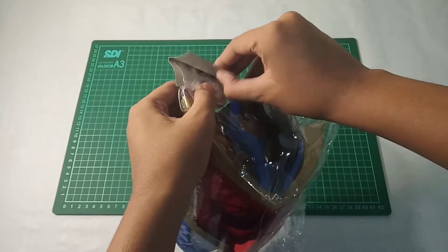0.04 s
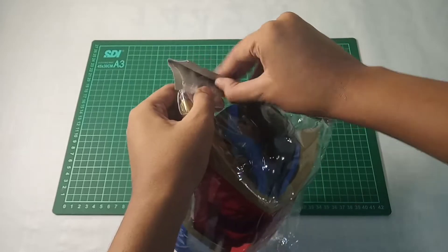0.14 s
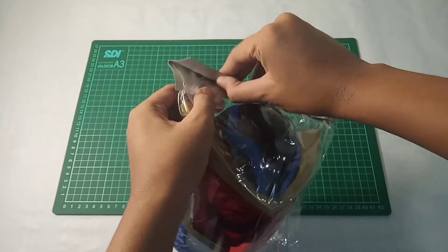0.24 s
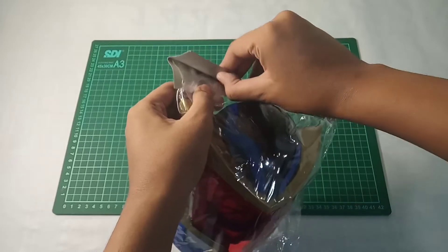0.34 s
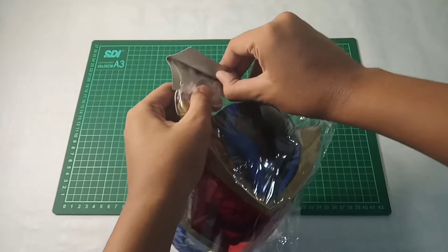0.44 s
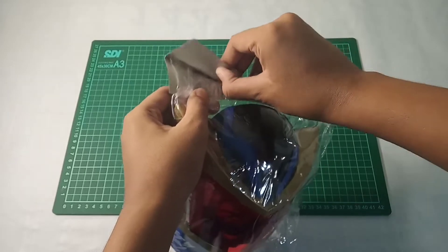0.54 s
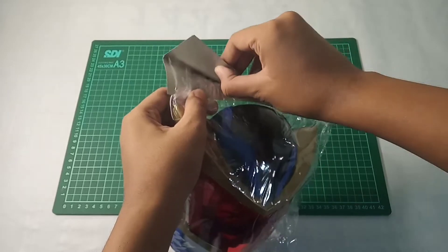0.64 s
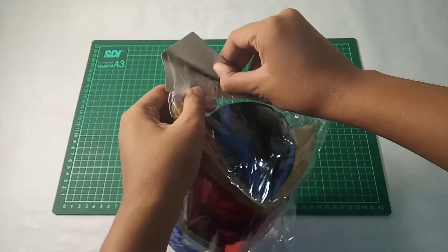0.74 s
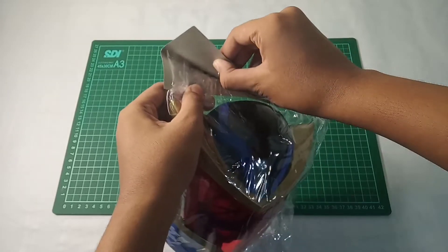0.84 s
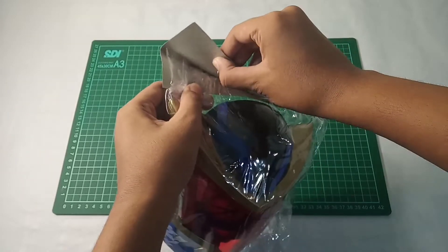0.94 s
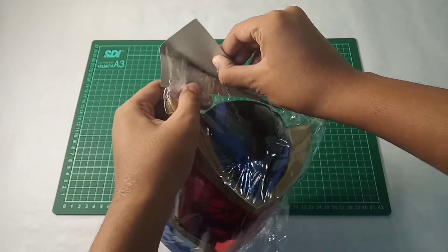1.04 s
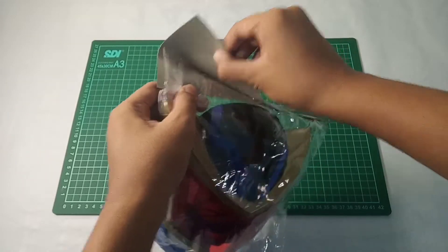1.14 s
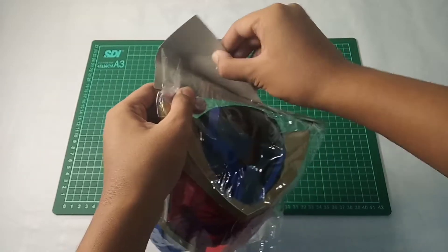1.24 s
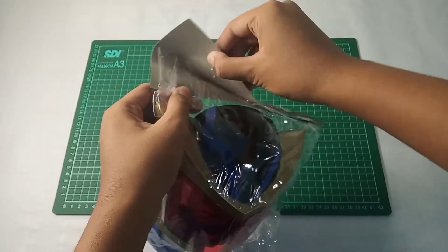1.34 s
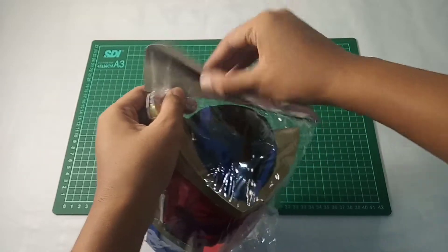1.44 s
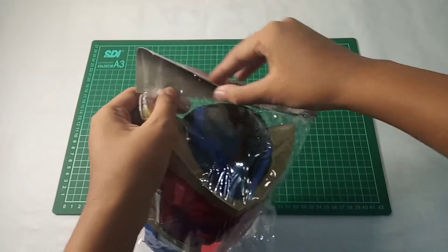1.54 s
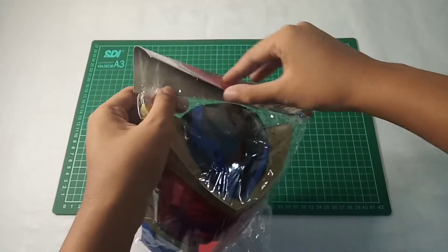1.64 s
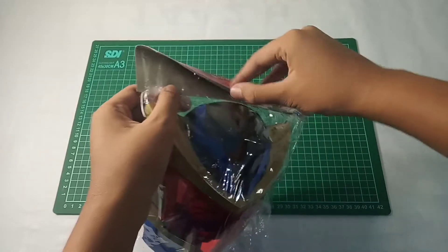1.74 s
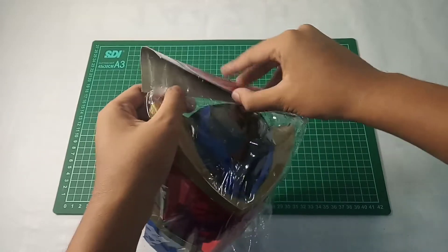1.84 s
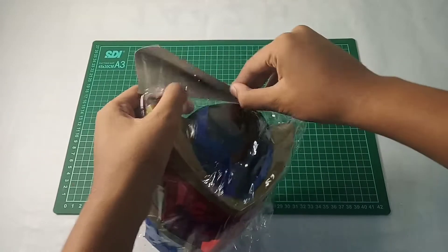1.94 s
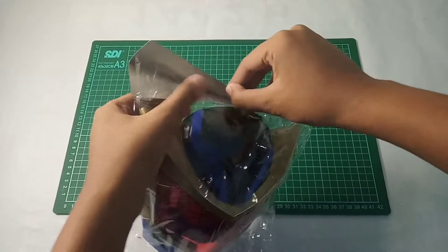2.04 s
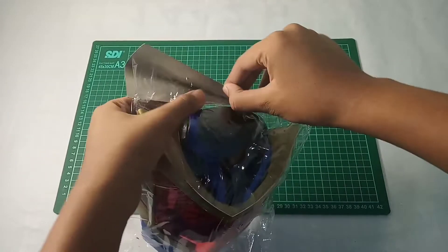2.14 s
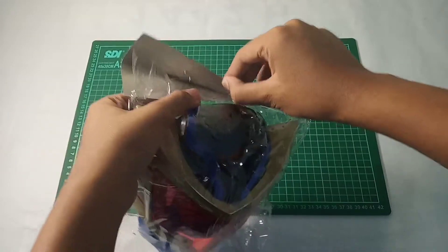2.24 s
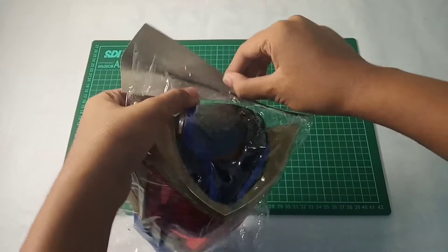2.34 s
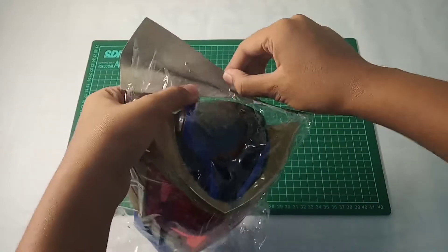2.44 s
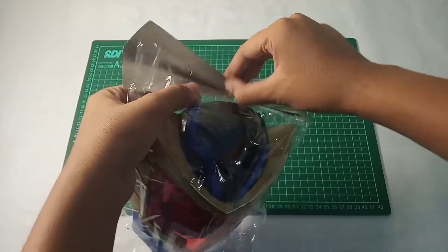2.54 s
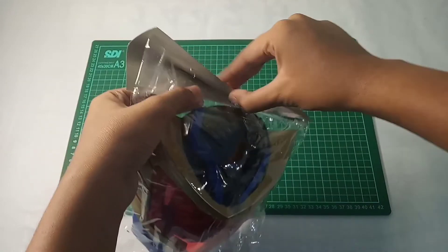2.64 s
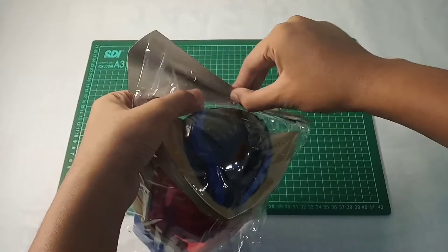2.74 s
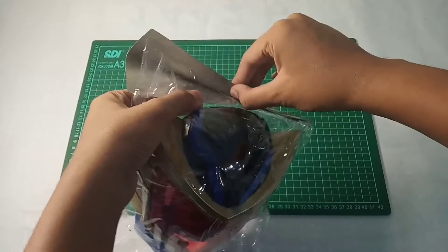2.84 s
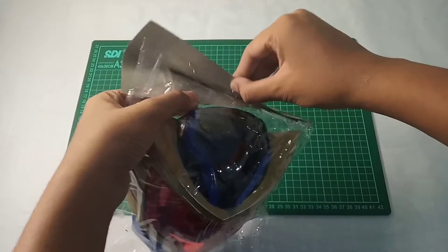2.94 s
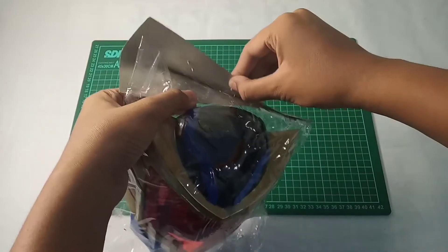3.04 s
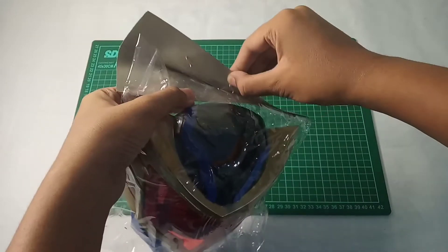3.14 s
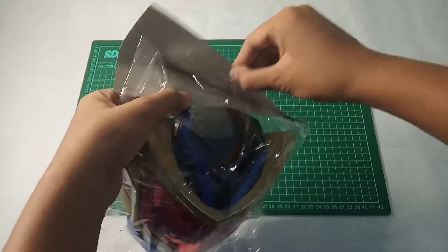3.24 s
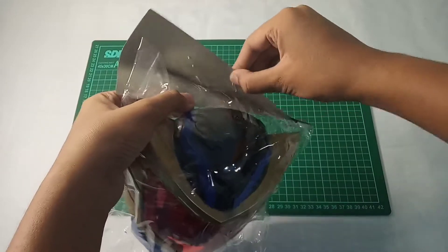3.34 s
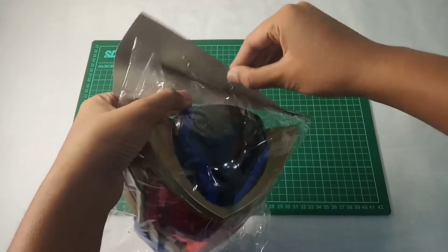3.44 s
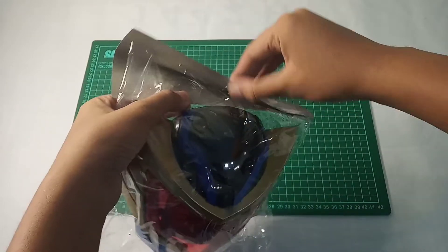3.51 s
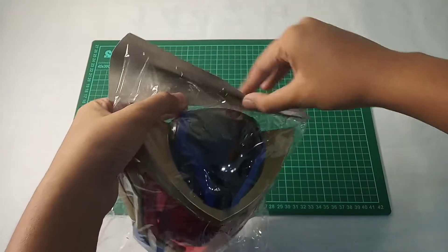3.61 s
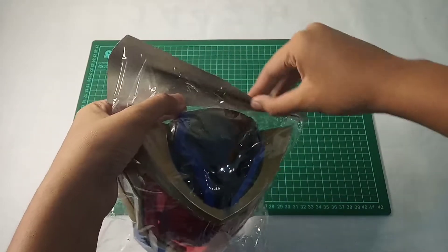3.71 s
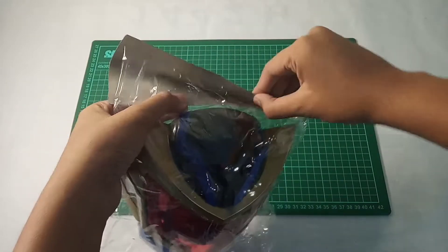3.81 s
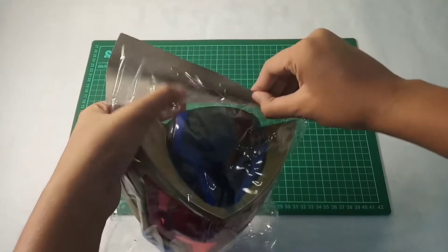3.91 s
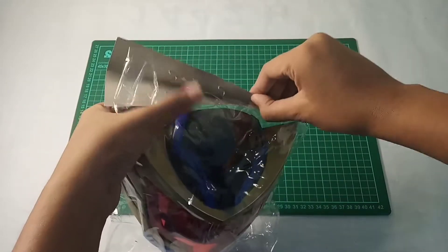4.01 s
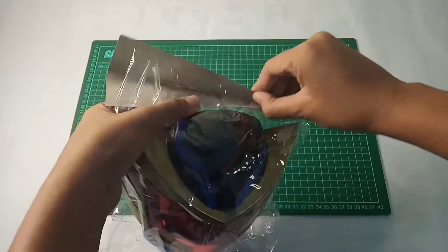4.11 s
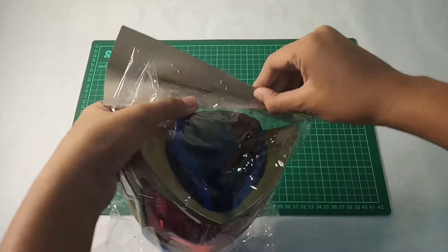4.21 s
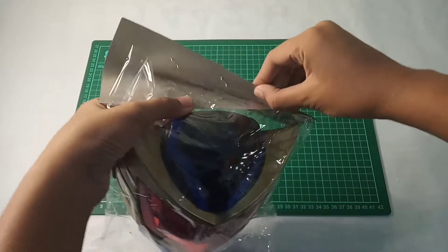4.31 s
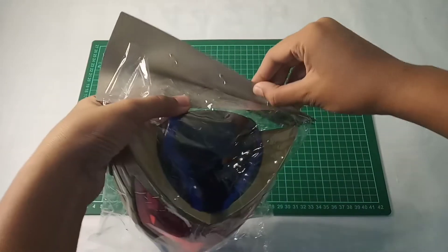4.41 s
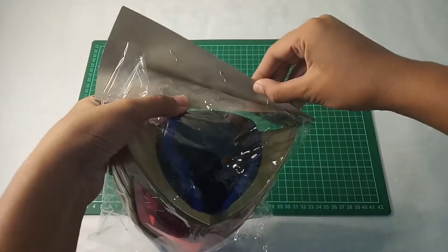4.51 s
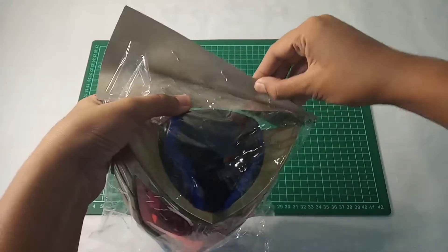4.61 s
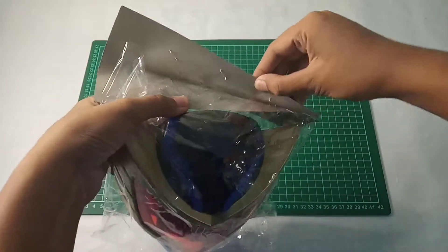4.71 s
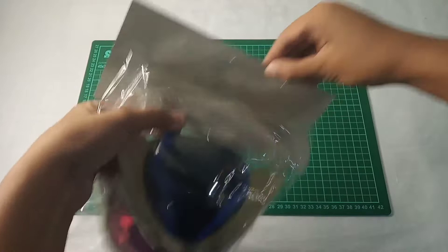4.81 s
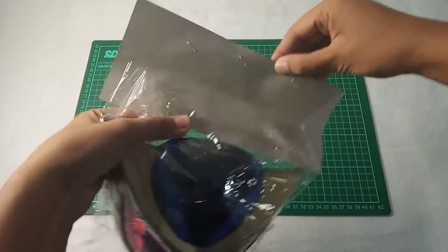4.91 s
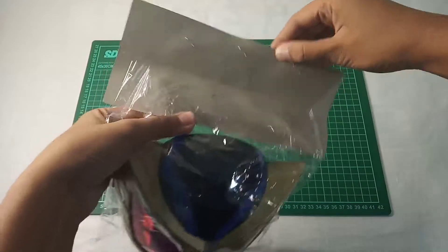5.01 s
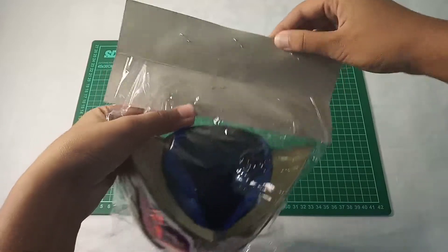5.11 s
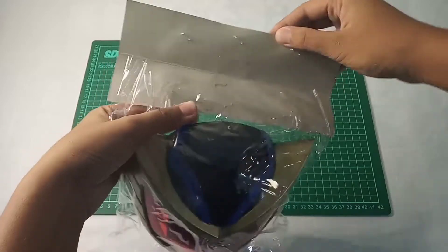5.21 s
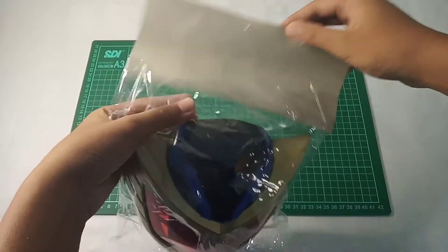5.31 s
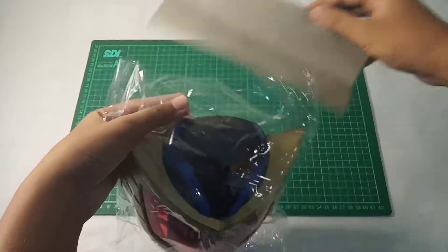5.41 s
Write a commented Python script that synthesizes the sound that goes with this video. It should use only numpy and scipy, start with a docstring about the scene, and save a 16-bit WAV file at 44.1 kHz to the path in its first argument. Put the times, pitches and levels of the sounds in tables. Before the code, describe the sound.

A close microphone in a small bare room catches stiff clear plastic being peeled open. Light crinkles tick at 0.1-0.2 s, then a near pause until a hard bright crack at 0.6 s. Another strong snap with a low flap lands at 1.2 s, followed by smaller clicks around 1.5 and 1.8 s. From 2.0 to 3.1 s the crackling is almost continuous: dull, papery buckles and short rustling slides, with sharper ticks among them. The heaviest pop, a floppy thump of the sheet with a bright edge, comes at 3.3 s. Scattered snaps follow at 3.6 s, a tight cluster at 4.0-4.1 s, and more at 4.3 and 4.5 s. A brilliant, loud burst bursts out at 4.8-4.9 s, then fades to faint scuffs, thin squeaky drag and small clicks around 5.3 s. Short reflections and a low boom trail the loud snaps; faint room noise and a slowly growing low hum lie beneath.

```python
"""Creases in a clear plastic bag buckle with sharp snaps as two hands peel a card out of it on a cutting mat.
Each snap is a click, a burst of noise and a ringing facet of film; low flaps are short swings of the sheet.
Between snaps the film slides (noise shaken by tiny slips), ticks at random, and flutters or sings (noise bands).
It is close to the microphone in a small bare room: the mat and walls throw the sound back, with a low boom.
Behind it lie a faint low hum that slowly grows and steady room noise."""
import sys
import numpy as np
from scipy import signal
from scipy.fft import rfft, irfft, next_fast_len
from scipy.io import wavfile
from scipy.ndimage import uniform_filter1d

SR = 44100
rng = np.random.default_rng(int(sys.argv[2]) if len(sys.argv) > 2 else 0)


def persist_wave(psi):
    """Save psi, clipped to +-1, as 16-bit WAV."""
    counts = np.round(np.clip(psi, -1, 1) * 32767).astype(np.int16)
    wavfile.write(sys.argv[1], SR, np.atleast_2d(counts).T)


N = 240991  # length of the scene in samples

# the film's four pitch ranges, called body, crack, fizz and sparkle: low edge f/Hz, high edge f/Hz
RANGES = [(620, 2200), (2200, 7500), (7500, 11000), (11000, 16000)]
# tone colour of the film: f/Hz, level/dB
FILM_COLOUR = [(200, 14.5), (700, 6.5), (950, 3), (1350, 0.5), (1850, -1.5), (2500, 6), (3100, 7),
               (3900, 7.5), (5000, 4.5), (6300, 3.5), (7600, -12.5), (9500, -8), (12000, -23),
               (15500, -29.5)]
SNAP_SIZE = 2048  # samples in one short sound
TOP_HZ = 15550  # nothing much is heard above this
DIRECTIONS = 6  # ways in which the film sends out its sound


def creases():
    """Buckling creases snap and nudge the sheet, which also flaps; brightness tips a snap from body to fizz."""
    # creases that buckle: t/s, level before the snap's trim/dB, brightness/dB, facet f/Hz, ring time/ms
    buckles = [(.115, -47.5, 6.5, 6100, 7.6), (.17, -46.5, 5, 3030, 10), (.221, -47, 2.5, 6260, 2.3),
               (0.465, -68.5, 24.5, 5860, 5), (0.523, -55.5, 14, 5730, 3), (0.566, -41.5, 2, 1425, 6),
               (.601, -31.5, 2, 1540, 2.3), (.6154, -22, 4.5, 4020, 1.44), (1.082, -41.5, 5, 1460, 3),
               (1.155, -51, 4, 3540, 4.6), (1.19, -19, 4.5, 1560, 1.83), (1.229, -34.5, 3, 2520, 6.6),
               (1.459, -48, 7, 3500, 1.5), (1.508, -42.5, 4, 2940, 2.1), (1.512, -31, 6, 2110, 4.5),
               (1.543, -38.5, 6.5, 5170, 1.2), (1.558, -44.5, 3.5, 980, 20), (1.721, -54, 0, 2460, 2.3),
               (1.7672, -46.5, 6.5, 6200, 0.88), (1.784, -30.5, 3, 1440, 2.3),
               (1.985, -46, 19.5, 2450, 0.82), (2.015, -50, 14, 5800, 3.6),
               (2.037, -47.5, -10.5, 1340, 3.3), (2.055, -37, 5, 3540, 2.6), (2.093, -40, -5.5, 956, 4.8),
               (2.126, -33, 1, 3600, 3), (2.145, -52.5, -11, 1750, 3), (2.158, -30, 6.5, 4870, 1.3),
               (2.217, -50.5, -12, 1290, 3.2), (2.266, -52, -2, 1080, 2.6), (2.3, -49.5, -10.5, 1030, 1.6),
               (2.342, -45, -12, 1050, 1.1), (2.398, -43, -4.5, 975, 4.5), (2.448, -63, -14, 975, 2.8),
               (2.566, -57, -4, 1383, 15), (2.615, -32.5, 3, 1308, 5.9), (2.625, -37.5, -7, 963, 10),
               (2.7002, -34.5, -2, 1370, 4.2), (2.723, -40, -10, 995, 1.9), (2.771, -40.5, -3, 960, 3.7),
               (2.798, -46.5, -6, 940, 3.3), (2.8306, -38, 3.5, 1360, 2.3), (2.859, -34, -3.5, 990, 1.8),
               (2.876, -35, -3.5, 1440, 2.1), (2.959, -35, 0, 3370, 2.2), (2.984, -30.5, 1, 907, 9.8),
               (3.136, -28, 0.5, 1300, 3.3), (3.281, -23, -1.5, 1340, 2.8), (3.311, -26, 10, 5130, 3.2),
               (3.317, -38.5, 12, 4900, 8.4), (3.561, -45.5, -3, 1450, 1.7), (3.574, -40.5, 9, 4620, 5.6),
               (3.5954, -33.5, 5, 5250, 1.3), (3.782, -43.5, -2, 650, 0.42), (3.97, -38.5, 2.5, 1320, 6),
               (3.992, -36, 4, 3080, 1.4), (4.013, -43, -2, 1500, 3), (4.03, -34, 1.5, 3700, 1.3),
               (4.038, -35, 2.5, 1580, 0.69), (4.079, -39, -1, 3500, 4.4), (4.109, -40, -0.5, 4730, 0.78),
               (4.143, -57, -7, 2360, 2.4), (4.19, -49, 0.5, 1340, 8.3), (4.208, -58.5, -12.5, 1500, 2.9),
               (4.296, -64, -15, 1250, 9.4), (4.309, -28.5, 4.5, 4790, 1.47),
               (4.389, -43.5, 5.5, 4360, 1.7), (4.497, -30, 1.5, 1390, 1.7), (4.546, -34, 0.5, 2510, 2.3),
               (4.552, -35.5, 2.5, 4160, 2), (4.762, -44, -5.5, 1003, 4.8), (4.8275, -21, 9, 6420, 2.7),
               (4.8582, -29.5, 1.5, 1735, 11), (4.8841, -25.5, 3.5, 1260, 3.7), (4.899, -36, 7, 5130, 9.1),
               (4.913, -34.5, -8, 897, 4.4), (4.966, -42.5, -0.5, 2990, 3.4), (5.098, -62, -20, 940, 3.1),
               (5.3315, -49, 6, 2390, 2.1), (5.36, -56, -7, 1330, 4.1)]
    # the whole sheet flips over: t/s, f/Hz, level before the flap's trim/dB
    sheet_flips = [(.567, 453, -37.5), (.601, 480, -31.5), (.6154, 477, -24), (1.19, 300, -20),
                   (1.2, 370, -27), (1.23, 337, -28), (2.013, 483, -35.5), (2.055, 432, -45),
                   (2.127, 350, -34.5), (2.158, 375, -33.5), (2.217, 453, -36.5), (2.876, 324, -45.5),
                   (2.959, 318, -43), (2.985, 444, -27), (3.281, 442, -14), (3.311, 375, -26.5),
                   (3.318, 390, -32), (3.5955, 480, -42), (3.782, 577, -37), (4.011, 440, -39.5),
                   (4.19, 467, -43), (4.309, 475, -36), (4.496, 484, -25.5), (4.547, 428, -35),
                   (4.8276, 342, -25.5), (4.8845, 340, -26), (5.078, 300, -47.5), (5.361, 494, -46.5)]
    fizz_below_crack_db = -11  # at neutral brightness
    out = np.zeros((DIRECTIONS, N))
    # every crease nudges the sheet a little; this level is set against the crease's body
    nudge = flap(hz=404, db=-17)
    for s, db, bright_db, facet_hz, ring_ms in buckles:
        body_db = db - bright_db
        fizz_db = db + bright_db + fizz_below_crack_db
        crack = snap(ring_ms, facet_hz, (body_db, db, fizz_db))
        add(out, s, crack + undb(body_db) * nudge)
    for s, hz, db in sheet_flips:
        add(out, s, flap(hz, db))
    return out


def snap(ring_ms, facet_hz, range_db, click=.6, rise=.1, facet=0.41, facet_hold=1.0, facet_spread=0.031,
         shiver_hold=1.56, damping=0.92, snap_trim_db=1.5, edge_hz=1120):
    """One crease flips: a click, a shiver of bending waves, a ringing facet. One row for each direction."""
    t = np.arange(SNAP_SIZE) / SR
    ring_s = ring_ms / 1000
    # slow creases roll over, quick ones crack at once
    onset = 1 - np.exp(-t / (rise * ring_s))
    waves = rng.standard_normal((DIRECTIONS, SNAP_SIZE)) * onset

    # an uneven facet has three close pitches rather than one
    places = np.array([-1, 0, 1])[:, None, None]
    jitter = rng.uniform(-.5, .5, size=(3, DIRECTIONS, 1))
    detune = 1 + facet_spread * (places + jitter)
    facet_modes = ring(t, facet_hz * detune, facet_hold * ring_s).sum(axis=0)
    facet_ring = unit(onset * facet_modes)

    # each higher range dies sooner
    decays = ring_s * shiver_hold * damping ** np.arange(len(RANGES))[:, None, None]
    shiver = unit(waves * np.exp(-t / decays))
    # the quicker the flip, the more of it is one clean click
    tick = click / np.sqrt(ring_ms) * (t == 0)
    film = unit(travel(colour(shiver + tick, FILM_COLOUR))) + facet * facet_ring
    # a facet gives out little below its own pitch
    film = band(film, min(0.83 * facet_hz, edge_hz), TOP_HZ, order=4)

    gains = range_gains(*range_db, sparkle_db=-6.0)
    crack = sum(gain * unit(band(part, *edges)) for gain, part, edges in zip(gains, film, RANGES))
    return undb(snap_trim_db) * crack * np.sqrt(SR / 100)  # levels are averages over 10 ms


def travel(x, lag_s=0.000865, edge_echo=0.58, echo_s=0.0004873):
    """Bending waves cross the facet: slow lows arrive late, and an edge echo colours each direction differently."""
    hz = np.fft.rfftfreq(SNAP_SIZE, 1 / SR)
    late_lows = np.exp(-4j * np.pi * lag_s * np.sqrt(1000 * hz))
    delays_s = echo_s * 2 ** rng.uniform(-0.85, 1, size=(DIRECTIONS, 1))
    echo = 1 - edge_echo * np.exp(-2j * np.pi * hz * delays_s)
    return irfft(rfft(x) * late_lows * echo, SNAP_SIZE)


def flap(hz, db, flap_s=0.0031, flap_trim_db=-1):
    """The open sheet swings for a few cycles and gives out sound only around that pitch."""
    swing = ring(np.arange(SNAP_SIZE) / SR, hz, flap_s)
    heard = unit(band(swing, 0.5 * hz, 4.0 * hz))
    return undb(db + flap_trim_db) * heard * np.sqrt(SR / 100)


def pulling():
    """Pulls slide the film over card and fingers: each rises, holds and dies away. Gives level and brightness in dB."""
    # pulls: t at full strength/s, length/s, level before the slide's trim/dB, brightness/dB
    pulls = [(0, 0.17, -55.5, 0), (0.121, 0.09, -48.5, 6), (0.184, 0.091, -54.5, 0), (0.396, 0.03, -56, 13),
             (0.564, 0.045, -51.5, -2.5), (.97, 0.11, -60, 8), (1.063, 0.18, -55, 8.5),
             (1.468, 0.033, -52.5, 9.5), (1.59, 0.17, -50, 7), (1.97, 0.077, -39, 3.5),
             (2.06, 0.087, -44, 2), (2.207, 0.065, -41.5, -5), (2.293, 0.064, -47, -7),
             (2.387, 0.069, -51.5, -6), (2.569, 0.063, -46.5, -3.5), (2.607, 0.1, -39.5, -3),
             (2.723, .13, -49, -10), (2.888, 0.15, -44.5, -4), (3.052, 0.13, -48.5, -7.5),
             (3.268, 0.21, -49, -2), (3.559, 0.089, -47, -4.5), (3.65, 0.16, -49.5, 2.5),
             (3.854, 0.031, -45, 7.5), (4.003, 0.016, -40.5, -6.5), (4.085, .06, -51.5, -6),
             (4.67, 0.19, -57.5, -0.5), (4.867, 0.017, -29.5, -0.5), (4.932, 0.093, -53.5, -11.5),
             (5.315, 0.02, -47, -2), (5.37, 0.075, -55, 1)]
    attack_s, release_s = 0.022, 0.029
    held_db = -65.5  # between pulls the held film barely stirs
    t = np.arange(0, N / SR, .001)
    power = np.full(len(t), undb(held_db) ** 2)
    bright = 0
    for s, length, db, bright_db in pulls:
        rise = np.clip((t - s) / attack_s + 1, 0, 1)
        fall = np.exp(-np.clip((t - s - length) / release_s, 0, 20))
        pull = (undb(db) * rise * fall) ** 2
        power = power + pull
        bright = bright + bright_db * pull
    # go from millisecond steps to samples
    sample_t = np.arange(N) / SR
    level_db = np.interp(sample_t, t, 10 * np.log10(power))
    return level_db, np.interp(sample_t, t, bright / power)


def sliding(level_db, bright_db, slips_per_s=900, spread_db=2.5, grain_s=0.0014, slide_trim_db=-2.0,
            sheet_db=-5, catch_db=2, catches_per_s=55):
    """Tiny slips of uneven size, dense enough to hiss, shake the film and faintly the sheet."""
    middling_db = -50  # level of a middling pull
    sheet_growth, fizz_growth = 0.88, 0.37  # dB for each dB that a pull is firmer than middling
    hiss = .4  # smooth share of the sliding, against its grains
    force_db = np.clip(level_db - middling_db, -10, 6)
    # body and fizz are set against the crack
    body_db = -5 - bright_db
    fizz_db = -15 + bright_db + fizz_growth * force_db

    sizes = undb(spread_db * np.minimum(rng.exponential(size=N), 4.5))
    slips = (rng.random(N) < slips_per_s / SR) * sizes
    # each slip shakes the film and dies away over the grain time
    shaking = np.sqrt(signal.lfilter([1], [1, -np.exp(-2 / (grain_s * SR))], slips ** 2))
    grains = unit(shaking * rng.standard_normal(N))
    film = colour(grains + hiss * unit(rng.standard_normal(N)), FILM_COLOUR)
    # the film catches and lets go, so it never slides evenly
    film = film * undb(catch_db * walk(catches_per_s))

    upper = band(film, 960, TOP_HZ, order=4)
    gains = range_gains(body_db, np.zeros(N), fizz_db, sparkle_db=-3.5)
    out = sum(gain * unit(band(upper, *edges)) for gain, edges in zip(gains, RANGES))
    # a firmer pull shakes more of the sheet
    sheet_gain = undb(body_db + sheet_db + sheet_growth * force_db)
    sheet = sheet_gain * unit(band(film, 285, 652))
    return (out + sheet) * undb(level_db + slide_trim_db) * np.sqrt(N)


def wrinkles(level_db, bright_db, most_ticks_per_s=13, firm_db=-46, give_db=2.5, tick_db=-7, spread_db=3,
             body_db=-3, fizz_db=-6):
    """Tiny wrinkles give way at random, mostly in firm pulls; a dull pull favours the larger, lower facets."""
    # facets of the wrinkles: f/Hz, ring time/ms
    facets = [(950, 7), (1350, 9), (2400, 2.3), (3600, 1.7), (5500, 3.6)]
    out = np.zeros((DIRECTIONS, N))
    # chance of a tick in each sample, for each kind of facet
    chance = most_ticks_per_s / SR / (1 + .5 * np.exp((firm_db - level_db) / give_db))
    for facet_hz, ring_ms in facets:
        tick = snap(ring_ms, facet_hz, (body_db, 0, fizz_db), click=0.56, rise=0.047)
        size_db = spread_db * np.minimum(rng.exponential(size=N), 2.5)
        favour = np.log2(facet_hz / 3000) / 2
        for i in np.flatnonzero(rng.random(N) < chance):
            db = level_db[i] + favour * bright_db[i] + size_db[i] + tick_db
            add(out, i / SR, tick * undb(db))
    return out


def flutters():
    """The bag flutters and scuffs when the card jerks in it: brief wide bands of noise."""
    # flutters: middle t/s, length/s, f/Hz, level/dB
    jerks = [(.21, 0.058, 114, -61), (.81, 0.036, 790, -57), (1.2, 0.012, 130, -43.5),
             (3.305, 0.036, 145, -35.5), (4.015, 0.047, 169, -51), (4.885, 0.042, 620, -32),
             (4.895, 0.033, 130, -34.5), (4.95, 0.25, 110, -55), (5.09, 0.02, 286, -40),
             (5.445, 0.021, 170, -59)]
    return swells(jerks, width=0.43)


def singing():
    """The film sings thinly where the card drags on it: brief narrow bands of noise."""
    # thin tones: middle t/s, length/s, f/Hz, level/dB
    drags = [(.04, 0.14, 1005, -61.5), (.99, 0.083, 1840, -65.5), (5.2, 0.1, 838, -60),
             (5.265, 0.12, 2330, -59.5), (5.42, 0.056, 2320, -61)]
    return swells(drags, width=0.05)


def swells(rows, width):
    """Resonances of the bag, rubbed into brief swells; width is a share of the pitch."""
    t = np.arange(N) / SR
    out = np.zeros(N)
    for s, length, hz, db in rows:
        envelope = np.exp(-2 * ((t - s) / length) ** 2)
        tone = band(rng.standard_normal(N), hz / (1 + width), hz * (1 + width), order=2)
        out += undb(db) * np.sqrt(length * SR) * unit(envelope * tone)
    return out


def near(x):
    """The direct sound and its first reflections: delayed, weaker copies."""
    # reflections from mat, table and wall: delay/ms, gain (plain factor)
    reflections = [(2.7, 0.03), (4.6, 0.13), (10.8, 0.16), (13.5, 0.01)]
    out = x.copy()
    for ms, gain in reflections:
        lag = int(ms * SR / 1000)
        out[lag:] += gain * x[:-lag]
    return out


def room(rays, gap_s=0.0051, build_s=0.016):
    """Each ray finds its own way round the walls into a blurred tail; together they ring the low standing waves."""
    # blurred echo: f/Hz, level against the direct sound/dB, time to fall by 60 dB/s
    echo_bands = [(98.7, -13, 0.07), (300, -10.5, 0.3), (716, -9.5, 0.33), (1500, -17, 0.53),
                  (2820, -12.5, 0.53), (5100, -13.5, 0.75), (8500, -12, 0.55), (15000, -18, 0.37)]
    # standing waves between the walls: f/Hz, level for the average ray/dB, time to fall by 60 dB/s
    standing_waves = [(113, -70, 0.16), (244, -30.5, 0.44), (291.6, -29, 0.26), (322.5, -31.5, 0.42),
                      (410.4, -40, 0.17), (451.5, -35.5, 0.32), (615.4, -28.5, 0.19)]
    t = np.arange(int(SR * .6)) / SR
    hz, db, t60 = np.transpose(echo_bands)
    grid = np.log(np.maximum(np.fft.rfftfreq(len(t), 1 / SR), 1))
    noise = rfft(rng.standard_normal((len(rays), len(t)))) / np.sqrt(len(rays))
    # the echo waits for a short gap, then builds up
    swell = 1 - np.exp(-np.maximum(t - gap_s, 0) / build_s)
    response = 0
    # each band is one row's share of the noise, blending into its neighbours
    for share, echo_db, decay in zip(np.eye(len(hz)), db, t60):
        part = irfft(noise * np.interp(grid, np.log(hz), share), len(t))
        response += undb(echo_db) * part * unit(swell * undb(-60 * t / decay))
    for mode_hz, mode_db, decay in standing_waves:
        mode = unit(swell * ring(t, mode_hz, decay / np.log(1000)))
        response += undb(mode_db) * mode / len(rays)
    return signal.fftconvolve(rays, response, axes=-1).sum(axis=0)[:N]


def hum(hum_hz=290.3, width=0.057, start_db=-68.5, growth_db_per_s=1.62):
    """A faint low hum: a narrow band of noise, so it wavers by itself, that slowly grows."""
    tone = unit(band(rng.standard_normal(N), hum_hz / (1 + width), hum_hz * (1 + width), order=2))
    level_db = start_db + growth_db_per_s * np.arange(N) / SR
    return np.sqrt(N) * tone * undb(level_db)


def air(air_db=-66.5):
    """Faint steady room noise: coloured random noise."""
    # colour of the still air: f/Hz, relative level per Hz/dB
    air_colour = [(25, -0.5), (60, 0), (115, 6), (200, -0.5), (290, 0.5), (400, -10), (700, -8),
                  (1200, -26.5), (2200, -14), (5500, -20), (9000, -14), (15000, -27)]
    return undb(air_db) * np.sqrt(N) * unit(colour(rng.standard_normal(N), air_colour))


def range_gains(body_db, crack_db, fizz_db, sparkle_db, brightening=0.18, fizz_trim_db=0.5):
    """Gains of the four ranges: the more fizz there is against crack, the more of it reaches the very top."""
    top_db = fizz_db + sparkle_db + brightening * np.clip(fizz_db - crack_db, -8, 8)
    return undb([body_db, crack_db, fizz_db + fizz_trim_db, top_db])


def walk(per_s):
    """Random levels joined by straight slopes; they spread by about 1."""
    hold = int(SR / per_s)
    steps = np.repeat(rng.standard_normal(N // hold + 1), hold)[:N]
    return 1.2 * uniform_filter1d(steps, hold)


def ring(t, hz, decay_s):
    """A struck resonance: a dying sine of unit energy."""
    return unit(np.sin(2 * np.pi * hz * t) * np.exp(-t / decay_s))


def band(x, low_hz, high_hz, order=3):
    """Keep only the pitches between two edges."""
    sos = signal.butter(order, [low_hz, min(high_hz, .48 * SR)], "band", fs=SR, output="sos")
    return signal.sosfilt(sos, x)


def colour(x, points):
    """Filter through (Hz, dB) points without smearing sound ahead of its cause."""
    hz, db = np.transpose(points)
    size = next_fast_len(x.shape[-1] // 2 + 1) * 2
    grid = np.maximum(np.fft.rfftfreq(size, 1 / SR), 1)
    # folding the spectrum of the log gain (the cepstrum) forward in time gives a minimum-phase filter
    cepstrum = irfft(np.log(undb(np.interp(np.log(grid), np.log(hz), db))))
    cepstrum[1:size // 2] *= 2
    cepstrum[size // 2 + 1:] = 0
    return irfft(rfft(x, size) * np.exp(rfft(cepstrum)))[..., :x.shape[-1]]


def unit(x):
    """Scale each row to unit energy."""
    return x / np.sqrt(np.sum(x ** 2, axis=-1, keepdims=True) + 1e-18)


def undb(db):
    """Decibels to gain."""
    return 10 ** (np.asarray(db) / 20)


def add(out, s, sound):
    """Mix a short sound in at its moment."""
    start = int(s * SR)
    out[:, start:start + SNAP_SIZE] += sound[..., :N - start]


def scene():
    """The film snaps, slides, ticks, flutters and sings; one direction faces the microphone, the rest feed the room."""
    level_db, bright_db = pulling()
    rays = creases() + sliding(level_db, bright_db) + wrinkles(level_db, bright_db)
    rays = rays + flutters() + singing()
    return (near(rays[0]) + room(rays[1:]) + hum() + air())[None]


def record(dry):
    """The recorder rounds the tallest peaks and cuts the top."""
    rounded = dry / (1 + (dry / .85) ** 6) ** (1 / 6)
    return signal.sosfilt(signal.ellip(8, .2, 70, TOP_HZ, fs=SR, output="sos"), rounded)


dry = scene()
out = record(dry)
persist_wave(out)
```